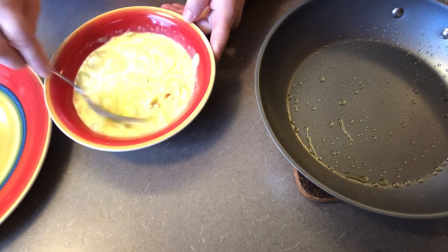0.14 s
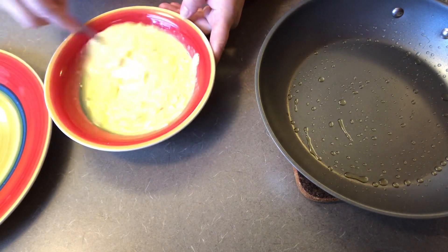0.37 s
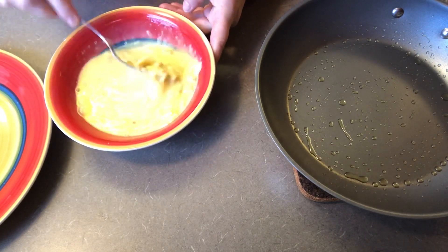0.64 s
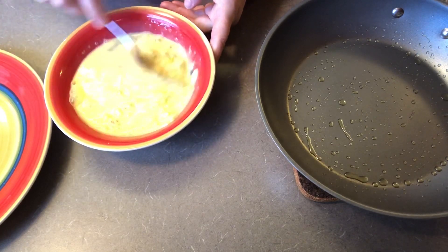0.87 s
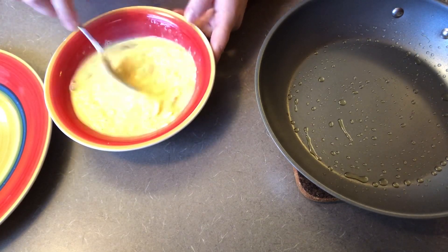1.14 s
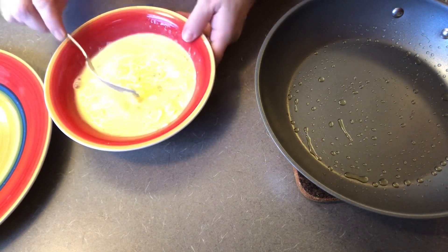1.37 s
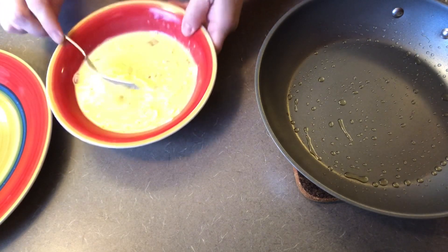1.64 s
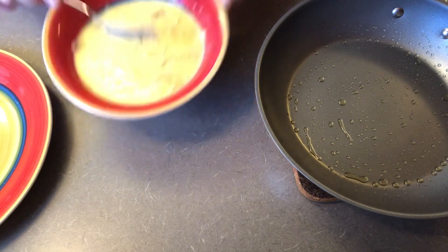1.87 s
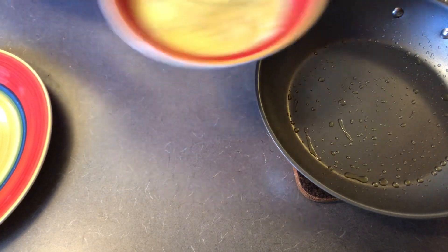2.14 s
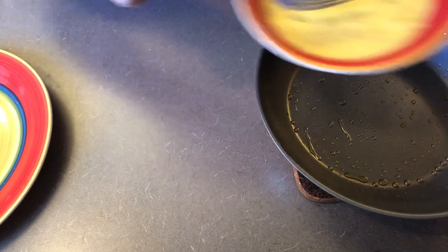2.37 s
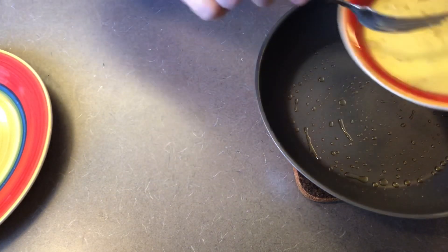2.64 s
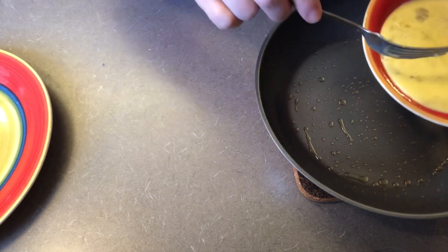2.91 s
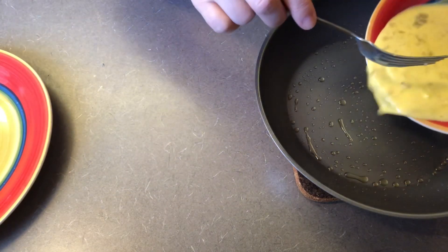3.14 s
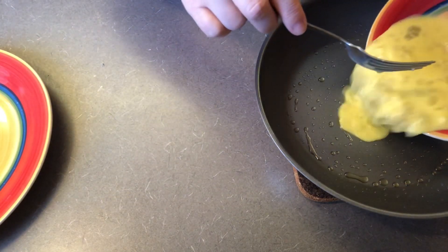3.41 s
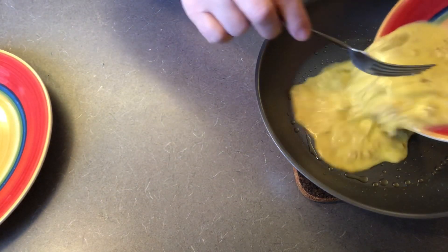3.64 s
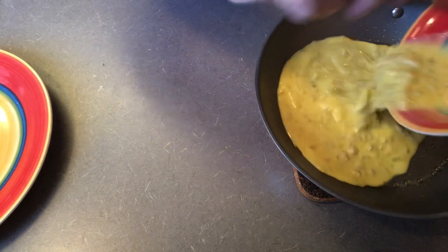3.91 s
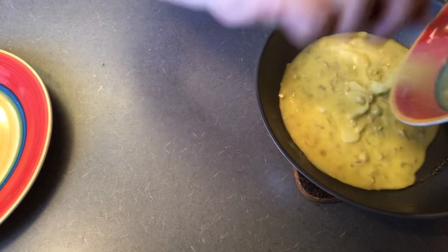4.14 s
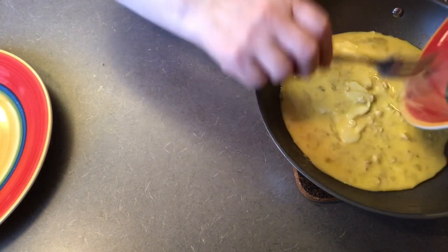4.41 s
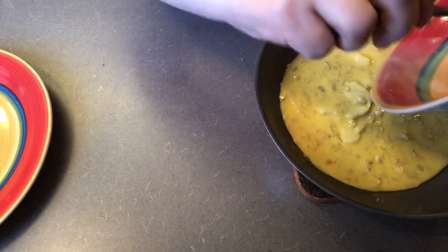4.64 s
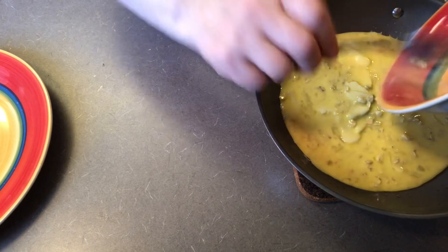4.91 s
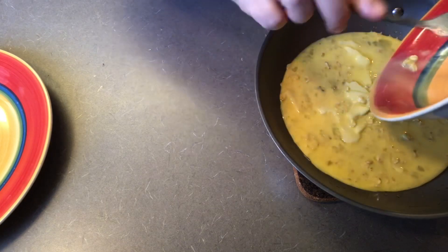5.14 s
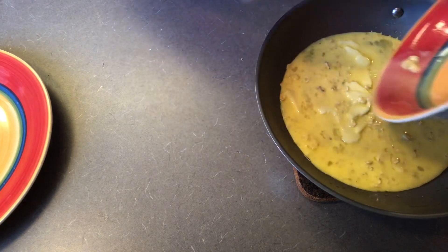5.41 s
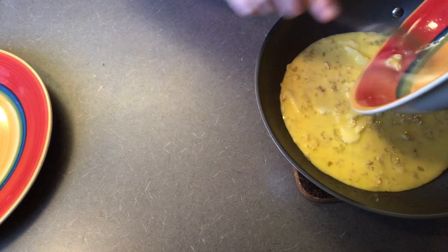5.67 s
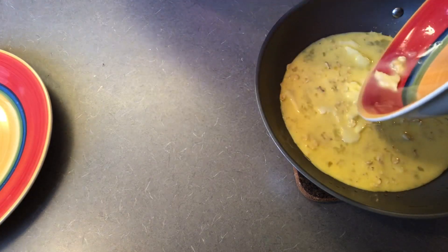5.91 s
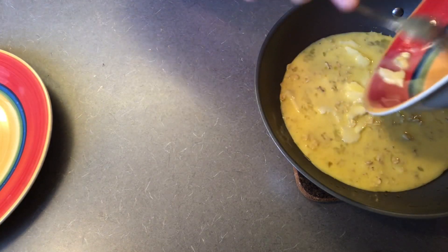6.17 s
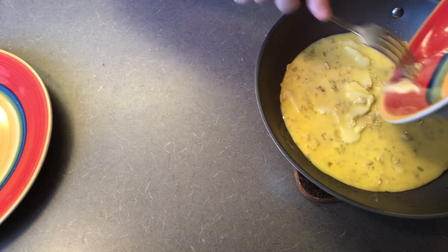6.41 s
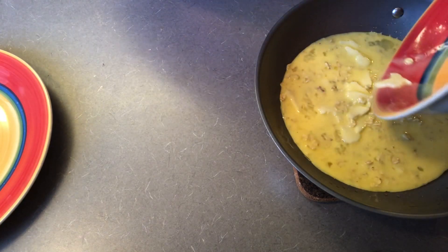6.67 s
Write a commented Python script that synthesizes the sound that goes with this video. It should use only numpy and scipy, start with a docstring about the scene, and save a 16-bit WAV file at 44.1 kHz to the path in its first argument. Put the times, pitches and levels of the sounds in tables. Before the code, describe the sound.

A quiet small kitchen with a steady low hum and slight diffuse echo, heard close. From 0 to 1.3 s a fork stirs thick batter: faint wet crackle, a muted scrape and sharp wet clicks near 0.23 s, then tiny ticks. At 1.4 and 1.58 s the fork clinks firmly on the full ceramic bowl, damped, with a dull worktop bump; lighter clinks follow at 1.9, 2.1 and 2.2 s. Only hum until 3.2 s, when a first drop spits in hot fat. From 3.45 s the pour hisses and gurgles with a few snaps, then gradually weakens. From 4 to 4.8 s, quick rough scrapes with squeaks and clanks; brighter ringing blows and scrapes at 5.1 and 5.4-5.7 s, including a high squeak. A clink at 5.9 s, softer scraping to 6.45 s, and two light taps near 6.7 s over faint frying.

```python
"""A steel fork stirs egg batter in a ceramic bowl with a faint wet crackle, then knocks on the bowl.
A first drop of batter lands in a hot pan, the pour follows, and its sizzle and gurgle fill the scene.
The fork then scrapes the bowl out: slips and blows ring bowl and fork modes, pressed tines squeak.
Throughout, a small kitchen hums as shaped noise and answers with diffuse echoes."""
import sys
import numpy as np
from scipy import signal
from scipy.fft import rfft, irfft, next_fast_len
from scipy.io import wavfile
from scipy.ndimage import uniform_filter1d

SR = 44100
rng = np.random.default_rng(int(sys.argv[2]) if len(sys.argv) > 2 else 0)


def nominal_scale(level):
    """Amplitude ratio for a level in decibels (scalar or array-like)."""
    x = np.asarray(level, float) / 20
    return 10 ** x


def to_wav(s):
    """Save 16-bit WAV."""
    ch = np.atleast_2d(s).T  # columns
    pcm = np.round(np.clip(ch, -1, 1) * 32767)  # PCM
    wavfile.write(sys.argv[1], SR, pcm.astype(np.int16))


N = 299439
TIME = np.arange(N) / SR

# Ringing modes of the ceramic bowl, before damping by batter or touch.
# Each row: frequency in Hz, level in dB, free t60 in seconds.
BOWL_MODES = [(2030, -30, 0.035), (1993, 6.5, 0.096), (2170, -15, 0.14), (2747, -27.5, .03),
              (3149, -8, 0.025), (3362, -4, 0.05), (4920, 2.5, 0.013), (5060, -1.5, 0.11),
              (5350, -5, 0.016), (6290, -13, 0.076), (7000, 0.5, .04), (6710, -3, 0.027),
              (7300, -5.5, 0.084), (8350, -12, 0.029), (9034, -6, 0.12), (10360, 3.5, 0.013),
              (11200, 1, 0.013), (10900, -3.5, .04), (11400, -2.5, .04), (12200, 0.5, 0.079),
              (12960, -1, 0.023), (13400, -20, .04), (13700, -6.5, .03), (14900, -10.5, 0.047)]
# Ringing modes of the steel fork, before damping by grip or touch.
# Each row: frequency in Hz, level in dB, free t60 in seconds.
FORK_MODES = [(3700, -12, 0.18), (4470, 2, 0.16), (4380, 2.5, 0.18), (5470, -23, 0.26), (6596, 4.5, 0.13),
              (7680, -6.5, 0.089), (8480, -10.5, 0.12), (9710, -0.5, 0.049), (9500, -22, 0.21),
              (12230, -20.5, 0.04), (14100, -17.5, 0.033)]
# Dull modes of the bowl wall, before damping by the hand or touch.
# Each row: frequency in Hz, level in dB, free t60 in seconds.
WALL_MODES = [(297, -4, 0.075), (446, 3.5, 0.22), (656, -2.5, 0.097), (920, -2, 0.1), (1070, -0.5, 0.016),
              (1280, -1.5, 0.0033), (1650, -4.5, 0.0088)]
# Where a contact lands decides how hard each region of bowl modes is driven. Region centres in Hz.
REGIONS_HZ = [2000, 3300, 5000, 11000]


def rms_one(x):
    """Scale to rms 1."""
    return x / np.sqrt(np.mean(x ** 2) + 1e-20)


def at_hz(points, hz):
    """Read a (Hz, value) table on a log-frequency axis."""
    table_hz, values = np.array(points)[:, 0], np.array(points)[:, 1]
    return np.interp(np.log(hz), np.log(table_hz), values)


def gain_curve(points):
    """Gain over time from (seconds, dB) points; silent outside them."""
    s, level_db = np.transpose(points)
    return nominal_scale(np.interp(TIME, s, level_db, -200, -200))


def coloured(x, spectrum, peaks=()):
    """Filter x by a spectrum in dB with optional humps of (Hz, width in Hz, dB); rms 1."""
    size = next_fast_len(N)
    hz = np.maximum(np.fft.rfftfreq(size, 1 / SR), 1)
    db = at_hz(spectrum, hz)
    for mid_hz, width_hz, top_db in peaks:
        db = db + top_db * np.exp(-((hz - mid_hz) / width_hz) ** 2)
    return rms_one(irfft(rfft(x, size) * nominal_scale(db), size)[:N])


def band(x, low_hz, high_hz):
    """Band-pass, rms 1."""
    return rms_one(signal.sosfilt(signal.butter(2, [low_hz, high_hz], "band", fs=SR, output="sos"), x))


def grains(per_s, spread_db):
    """Random clicks of uneven size and sign; rms 1."""
    sizes = nominal_scale(spread_db * np.minimum(rng.exponential(1, N), 5)) * rng.choice([-1, 1], N)
    return rms_one(sizes * (rng.random(N) < per_s / SR))


def drift(rate):
    """Slow chance: straight lines between normal knots of spread 1, rate knots per second."""
    knots = rng.standard_normal(int(N / SR * rate) + 2)
    return np.interp(TIME * rate, np.arange(len(knots)), knots)


def ring(force, hz, t60):
    """Resonator: a unit click sets a decaying sine of height 1 ringing."""
    radius, angle = nominal_scale(-60 / (t60 * SR)), 2 * np.pi * hz / SR
    feedback = [1, -2 * radius * np.cos(angle), radius * radius]
    return signal.lfilter([0, np.sin(angle)], feedback, force + 1e-18)


def add(out, s, sound):
    """Mix a short sound in at time s."""
    at = round(s * SR)
    out[at:at + len(sound)] += sound[:N - at]


def blow(modes, colour_db, stretch=0.48, detune=0.0):
    """A loud clang while the contact damps the modes, then a freer ring; stretch scales its length.
    Modes start a little apart as the tines land in turn; grip and contact vary strength and pitch."""
    rise_s, spread_s = 0.00081, 0.004
    clang_db, clang_t60 = 1.0, 0.023
    grip_db, grip_per_s = 2.5, 70   # the shifting grip makes the level of every ring waver
    hz, level_db, t60 = np.transpose(modes)[:, :, None]
    start = spread_s * rng.random(hz.shape) ** 2
    t = np.maximum(np.arange(int(.2 * SR)) / SR - start, 0)
    level = nominal_scale(level_db + colour_db(hz) + 1.5 * rng.standard_normal(hz.shape))
    pitch = hz * (1 + detune + .003 * rng.standard_normal(hz.shape))
    knots = rng.standard_normal((len(hz), int(grip_per_s * t.shape[1] / SR) + 2))
    waver_db = grip_db * np.array([np.interp(row * grip_per_s, np.arange(len(k)), k)
                                   for row, k in zip(t, knots)])
    free_ring = nominal_scale(waver_db - 60 * t / (t60 * stretch))
    clang = nominal_scale(clang_db - 60 * t / clang_t60)
    rise = 1 - np.exp(-t / rise_s)
    return np.sum(level * (free_ring + clang) * np.sin(2 * np.pi * pitch * t) * rise, axis=0)


def tilted_blows(events, modes, pivot_hz):
    """Blows on one body; a harder contact tilts the strengths towards the upper modes."""
    out = np.zeros(N)
    for s, level_db, tilt_db in events:
        add(out, s, blow(modes, lambda hz: level_db + tilt_db * np.log2(hz / pivot_hz)))
    return out


def strikes():
    """Fork on bowl: bowl modes plus a short crack; batter shortens the ring and lowers the pitch a little."""
    # Each row: start in seconds, level in dB, nearness to the rim in dB before the region shares,
    # hardness as extra dB on the top region.
    hits = [(1.3985, -20, 2.5, -14), (1.5816, -19.5, 2, -15.5), (1.9143, -29, 13.5, 1.5),
            (2.0893, -27, 14, -1.5), (2.2301, -31.5, 14, -8.5), (3.9655, -44, 20, 19.5),
            (4.155, -55, 22.5, 13.5), (4.214, -52.5, 22.5, -13), (4.5254, -26, -7, -2.5),
            (4.9611, -29.5, -2.5, 5), (5.0903, -40, -3, 2.5), (5.1534, -63, 16, -2), (5.187, -42.5, 4, -2),
            (5.4309, -33.5, -4, -1), (5.5644, -50, 19.5, 12), (5.6216, -37, 8.5, 6.5),
            (5.8967, -32, -3, -1.5), (6.6535, -33, -6.5, -4.5), (6.7284, -42, 0.5, -1)]
    # Share of the rim gain that each region gets, a factor.
    rim_shares = [0.18, 1.285, 0.86, 0]
    # Ring length factor per region while batter loads the bowl.
    ring_full = [0.13, 0.41, 0.58, .2]
    # Ring length factor per region once the bowl is empty.
    ring_empty = [0.83, 1.4, 0.89, 0.94]
    empty_s = 4.4
    out, t = np.zeros(N), np.arange(int(.06 * SR)) / SR
    crack_hz = np.maximum(np.fft.rfftfreq(len(t), 1 / SR), 1)
    for s, level_db, rim_db, top_db in hits:
        region_db = level_db + rim_db * np.array(rim_shares) + top_db * np.array([0, 0, 0, 1])
        colour = list(zip(REGIONS_HZ, region_db))
        lengths = ring_full if s < empty_s else ring_empty
        stretch = at_hz(list(zip(REGIONS_HZ, lengths)), np.array(BOWL_MODES)[:, :1])
        add(out, s, blow(BOWL_MODES, lambda hz: at_hz(colour, hz), stretch, detune=0.001 * (stretch - 1)))
        slope = [(200, level_db - 45), (1000, level_db - 3.0)]   # a small contact radiates little bass
        noise = rms_one(rng.standard_normal(len(t)))
        crack = irfft(rfft(noise) * nominal_scale(at_hz(slope + colour, crack_hz)), len(t))
        add(out, s, nominal_scale(9.0) * crack * nominal_scale(-60 * t / .025) * (1 - np.exp(-t / 0.00077)))
    return out


def knocks():
    """Dull knocks of the whole bowl ring the low modes of its wall."""
    # Each row: start in seconds, level in dB, tilt in dB per octave.
    hits = [(1.402, -30.5, 7), (1.58, -50.5, 11.5), (1.914, -31.5, 18.5), (2.089, -35, 9), (2.229, -43, 6),
            (5.093, -36, 3), (5.13, -40.5, 0), (5.196, -53, 19.5), (5.559, -46.5, 18), (5.622, -35, 9.5)]
    return tilted_blows(hits, WALL_MODES, 810)


def twangs():
    """Blows that set the fork's tines ringing in their own modes."""
    # Each row: start in seconds, level in dB, treble tilt in dB per octave.
    hits = [(4.156, -54, -1), (4.6543, -50.5, -9), (5.0913, -29, 13), (5.1534, -32.5, -19), (5.623, -22, 6)]
    return tilted_blows(hits, FORK_MODES, 5000)


def contact():
    """Drive of each bowl region and of the fork, from pressure and spot of every stroke."""
    # Strokes of the tines over the glaze, each a list of rows that the contact glides between; the third stroke
    # is faint and ends just before the knock at 1.4 s. Each row: time in seconds, pressure in dB, spot as
    # favoured region (held within 0-3), fork drive over pressure in dB before the loss while sunk.
    strokes = [
        [(0.0, -53, .2, -20), (.052, -52, 1.3, -22), (.096, -66, 1.1, -20), (.128, -54, 1.4, -3),
         (.156, -72, .3, -4), (.2, -50, 1.5, -10), (.232, -33, 1.36, -21), (.284, -62, 0.54, -19),
         (.32, -60, .1, -20), (.37, -67, .1, -24), (.42, -90, .1, -15)],
        [(.55, -74, .1, -8), (.736, -83, .9, -7), (.75, -55.5, 2, -9), (.79, -57, .1, -26),
         (.842, -71, 2.1, -6), (.87, -88, 1.1, -6)],
        [(1.22, -83.5, 1.5, -1), (1.268, -67, 1.5, -14), (1.39, -82.5, .9, -14)],
        [(3.98, -47, 1.2, 17), (4.004, -58, 1.1, -11), (4.038, -41, .1, -16), (4.054, -28.5, 0.082, -31.5),
         (4.078, -35.5, 2.44, -15), (4.104, -22, 1.1, -40), (4.118, -62, 2.4, -9), (4.14, -49, 1.6, -25)],
        [(4.16, -22, 0.96, -22), (4.17, -28, 1.3, -19), (4.18, -23, 1.2, -31), (4.205, -25.5, 1.1, -20.5),
         (4.218, -23.5, 1.7, -13), (4.242, -21.5, 1.05, -22), (4.262, -47, 0.78, -2), (4.315, -44.5, 2.9, -4),
         (4.331, -31, 0.88, -30), (4.351, -55, 0.09, -40.5), (4.4, -62, 4.2, -26)],
        [(4.535, -23.5, 0.4, -14.5), (4.561, -38.5, .9, -14), (4.573, -28.5, 5.9, -31), (4.593, -47.5, 2, -13),
         (4.61, -47, 2.1, -14)],
        [(4.66, -27.5, 2.8, -20), (4.674, -55, 2.1, 2.5), (4.696, -38.5, 3, 10.5), (4.72, -40, 2.7, -35.5),
         (4.733, -35.5, 2.8, -16), (4.771, -49.5, 0.77, -10), (4.785, -41, 0.7, -2), (4.83, -78, 1.2, -1)],
        [(5.1, -29, 1.8, 17), (5.112, -33.5, 1.6, 12), (5.128, -44, 2.3, 15), (5.162, -33, 2.1, 4.5),
         (5.178, -42, 1.3, 9.5), (5.19, -28.5, 0.16, 6.5), (5.202, -24.5, 3.15, 8), (5.238, -45, 0.72, -15),
         (5.26, -37.5, 0.83, -4.5)],
        [(5.44, -39, 4.3, -9), (5.46, -31, 0.14, -9), (5.47, -42, 0.25, -14), (5.5, -52.5, 2.6, -3.5),
         (5.521, -41.5, 0.26, 11), (5.541, -34.5, 0.45, -7), (5.558, -21, 2.03, -24), (5.578, -21, 1.3, 0),
         (5.608, -32.5, 0.81, 1), (5.618, -30, 2.3, -4), (5.65, -24, 2.3, -29.5), (5.67, -48.5, 3, 8),
         (5.72, -40, .2, 1.5)],
        [(5.92, -31, .1, -7), (5.944, -42, 0.6, -15), (5.984, -36.5, .5, -16.5), (6.006, -59, 1.1, -18),
         (6.02, -64, 0.89, -4)],
        [(6.09, -66.5, 0.18, -11), (6.128, -51, 0.8, -7), (6.148, -42.5, 0.11, -33), (6.234, -47.5, 0.55, -2.5),
         (6.266, -55, 1.3, -23), (6.3, -35.5, 0.98, -54), (6.319, -28.5, 0.54, -20), (6.363, -36.5, 1.8, -44),
         (6.385, -18, 0.86, -49), (6.403, -30, 0.86, -20), (6.46, -53, 2, -31)],
    ]
    spot_loss_db = 16   # per region away from the favoured one
    stir_end_s, sunk_db = 1.39, -15   # in strokes begun before this, tines sunk in batter hardly ring
    places = np.arange(len(REGIONS_HZ))[:, None]
    regions, fork = np.zeros((len(REGIONS_HZ), N)), np.zeros(N)
    for rows in strokes:
        s, *columns = np.transpose(rows)
        on = slice(int(s[0] * SR), int(s[-1] * SR))
        press_db, spot, fork_db = (np.interp(TIME[on], s, c) for c in columns)
        regions[:, on] += nominal_scale(press_db - spot_loss_db * np.abs(places - spot.clip(0, 3)))
        fork[on] += nominal_scale(press_db + fork_db + sunk_db * (s[0] < stir_end_s))
    settle = int(0.0021 * SR)   # pressure cannot jump
    return list(uniform_filter1d(regions, settle)), uniform_filter1d(fork, settle)


def rubbed(modes, drives, slips, touch_t60):
    """Slips drive every mode; the touch adds its losses to the mode's own, and as the contact wanders
    over the nodes each mode swells and fades on its own."""
    out = np.zeros(N)
    for (hz, level_db, free_t60), drive in zip(modes, drives):
        t60 = 1 / (1 / free_t60 + 1 / touch_t60)
        wander = np.exp(.29 * drift(30))
        ringing = ring(drive * slips * nominal_scale(level_db) * wander, hz, t60)
        out += ringing / np.sqrt(t60 * SR / np.log(1000) / 4)   # long rings come out no louder
    return out


def scrapes():
    """Dense slips of the tines drive bowl and fork modes and leave a gritty rasp around each region."""
    drum_db = -33.5   # drive of the wall under that of the fork
    regions, fork = contact()
    slips = grains(per_s=2500, spread_db=2.5) * nominal_scale(1.5 * drift(120))
    # each bowl mode shares the drives of its two nearest regions
    numbers = np.arange(len(regions))
    places = np.interp(np.log(np.array(BOWL_MODES)[:, 0]), np.log(REGIONS_HZ), numbers)
    drives = np.maximum(0, 1 - np.abs(places[:, None] - numbers)) @ np.array(regions)
    bowl = rubbed(BOWL_MODES, drives, slips, touch_t60=.09)
    tines = rubbed(FORK_MODES, [fork] * len(FORK_MODES), slips, touch_t60=.09)
    wall = rubbed(WALL_MODES, [nominal_scale(drum_db) * fork] * len(WALL_MODES), slips, touch_t60=.1)
    rasp = np.zeros(N)
    for drive, hz in zip(regions + [fork], list(REGIONS_HZ) + [4500]):
        rasp += drive * band(slips, hz / 1.6, hz * 1.5)
    out = nominal_scale(-12.0) * bowl + nominal_scale(-14.0) * tines + wall + nominal_scale(-31) * rasp
    return signal.sosfilt(signal.butter(3, 250, "high", fs=SR, output="sos"), out)   # too small for bass


def gliding_tones(events, waver, flutter_db):
    """Rough, wavering tones that glide, swell and fade; waver is the pitch spread at -35 dB."""
    edge_db = 10.5   # how far start and end lie under the middle
    waver_per_db = .6   # louder tones are rougher
    out, wobble, flutter = np.zeros(N), drift(500), drift(150)
    for k, (s, length, first_hz, last_hz, peak_db) in enumerate(events):
        part = np.linspace(0, 1, int(length * SR))
        on = slice(k * SR // 5, k * SR // 5 + len(part))   # each tone takes its own stretch of chance
        rough = np.clip(waver * nominal_scale(waver_per_db * (peak_db + 35)), waver / 2, .1)
        hz = (first_hz + (last_hz - first_hz) * part) * (1 + rough * wobble[on])
        level_db = peak_db - edge_db * (2 * part - 1) ** 2 + flutter_db * flutter[on]
        add(out, s, nominal_scale(level_db) * np.sin(2 * np.pi * np.cumsum(hz) / SR))
    return out


def squeaks():
    """A tine pressed on the glaze sings, its pitch gliding as the free length changes."""
    # Each row: start in seconds, length in seconds, first pitch in Hz, last pitch in Hz,
    # mid-tone level in dB before flutter.
    tones = [(3.967, 0.045, 3570, 2820, -32.5), (4.036, 0.062, 6470, 6550, -36),
             (4.021, 0.092, 2160, 2000, -36), (4.055, 0.061, 5300, 4880, -31.5),
             (4.056, 0.023, 2780, 2900, -46), (4.15, 0.026, 2740, 2750, -39.5),
             (4.166, .08, 1750, 1670, -47.5), (4.28, 0.067, 2300, 2260, -50),
             (4.306, 0.047, 3750, 3760, -42.5), (4.72, 0.057, 1976, 2295, -51),
             (5.184, 0.044, 934, 1060, -40.5), (5.554, 0.062, 1650, 850, -38.5),
             (5.545, .08, 4870, 4420, -22.5), (5.55, 0.064, 3650, 3450, -28),
             (6.168, 0.067, 4700, 4520, -58), (6.27, 0.072, 4570, 5400, -63),
             (6.199, 0.11, 2070, 2260, -58.5), (6.216, .07, 8300, 8000, -63),
             (6.235, 0.089, 3560, 3050, -47), (6.3, 0.098, 2990, 2840, -45.5),
             (6.35, 0.056, 6880, 6820, -37)]
    return gliding_tones(tones, waver=.02, flutter_db=4.0)


def stirring():
    """Batter moving round the fork: a faint wet crackle of dense small clicks."""
    # Each row: time in seconds, level in dB before a slow flicker.
    strength = [(0.0, -84), (0.166, -68), (0.336, -68), (0.468, -84), (0.726, -70.5), (1.048, -96.5),
                (1.268, -69.5), (1.39, -70)]
    # Each row: frequency in Hz, relative level in dB per Hz.
    colour = [(880, -27.5), (1500, 4), (1880, 1.5), (3120, -0.5), (4970, -7.5), (8490, -9), (16000, -18)]
    crackle = coloured(grains(per_s=1300, spread_db=3.0), colour)
    return gain_curve(strength) * crackle * nominal_scale(2.0 * drift(23.0))


def sizzle():
    """Frying: a dense hiss of tiny bursts with lone spits on top and larger bubbles gurgling below."""
    # Vigour of the frying, a first drop and then the pour. Each row: time in seconds, hiss level in dB.
    strength = [(3.17, -100), (3.19, -52.5), (3.3, -53.5), (3.43, -57), (3.46, -48.5), (3.54, -50.5),
                (3.66, -49), (3.9, -54.5), (4.4, -59), (4.9, -64), (5.4, -65.5), (5.85, -66.5),
                (6.1, -70.5), (6.55, -70.5), (6.79, -69)]
    # Each row: frequency in Hz, relative level in dB per Hz.
    colour = [(350, -31.5), (600, 4.5), (708, 16.5), (846, 7.5), (1610, -4), (2610, -8.5), (6200, -3),
              (8500, -9.5), (15100, -8), (16000, -20)]
    pour_s, spread_s = 3.5, 0.12   # the pool spreads: larger bubbles join, the finest spray is smothered
    hiss = gain_curve(strength)
    vigour = hiss / hiss.max()
    thin = np.exp(-np.maximum(TIME - pour_s, 0) / spread_s)
    gurgle = nominal_scale(-56 - 9.5 * thin) * vigour ** 0.39
    treble = nominal_scale(-73 + 8 * thin) * vigour ** 0.95
    bursts = []
    for _ in range(3):
        spits = .12 * grains(per_s=150, spread_db=2.0)
        bursts.append(coloured(grains(per_s=12000, spread_db=3.0) + spits, colour))
    bubbles = sum(ring(grains(per_s=120, spread_db=3.0), hz, 10.0 / hz) for hz in np.geomspace(1200, 2800, 8))
    low = band(bursts[0], 900, 2800) + .4 * rms_one(bubbles)
    return gurgle * low + hiss * band(bursts[1], 2200, 9000) + treble * band(bursts[2], 8300, 18000)


def glugs():
    """Air caught under the pour gurgles out, falling in pitch."""
    # Each row: start in seconds, length in seconds, first pitch in Hz, last pitch in Hz,
    # mid-tone level in dB before flutter.
    tones = [(3.46, 0.15, 1920, 1200, -53)]
    return gliding_tones(tones, waver=.2, flutter_db=5.0)


def ticks():
    """Wet clicks and spits of batter and fat: a small bursting bubble, rising in pitch, with a broad snap."""
    # Each row: start in seconds, level in dB, starting pitch in Hz, cycles over which the tone decays
    # (at least 0.5).
    clicks = [(0.062, -46, 3000, 1.1), (0.121, -40, 5060, 1.2), (0.2302, -22, 6360, 1.2),
              (0.2433, -28, 6200, 3.4), (0.314, -44, 2520, 0.76), (0.4344, -62, 5730, 3.7),
              (0.5089, -43, 5060, 4.0), (0.5824, -56.5, 4590, 2.4), (0.7525, -47, 2500, 1),
              (0.777, -52, 3650, 2.9), (0.809, -46, 7200, 2.9), (0.835, -48.5, 4960, 6.3),
              (0.9113, -48.5, 3370, 3.1), (0.999, -51, 3670, 4.4), (1.002, -50.5, 2630, 4.3),
              (1.1414, -54.5, 4160, 3.5), (1.26, -49.5, 3470, 4.8), (3.191, -29, 12800, 3.1),
              (3.209, -37, 6150, 1.6), (3.266, -35, 7300, 8.9), (3.3553, -30.5, 7590, 3.3),
              (3.621, -26.5, 5270, 1.7), (3.7858, -41.5, 6610, 5.2)]
    out, t = np.zeros(N), np.arange(int(.02 * SR)) / SR
    for s, peak_db, hz, cycles in clicks:
        fade = np.exp(-t * hz / max(cycles, .5))
        tone = np.sin(2 * np.pi * hz * t * (1 + 6.8 * t))
        snap = 0.14 * np.diff(rng.standard_normal(len(t) + 1)) * np.exp(-t / 0.00022)
        add(out, s, nominal_scale(peak_db) * (fade * tone + snap))
    return out


def bumps():
    """The bowl's foot bumps the worktop, whose modes ring; it is stiff and gives no deep bass."""
    # Each row: start in seconds, level in dB, tilt in dB per octave.
    hits = [(.79, -51, -3.5), (1.402, -29, -1.5), (1.418, -40, -1), (1.47, -52.5, -4.5), (1.52, -46, -2.5),
            (1.585, -51, 4)]
    # Modes of the worktop under the bowl, before the blow shortens them.
    # Each row: frequency in Hz, level in dB, free t60 in seconds.
    worktop = [(119, -4.5, 0.06), (155, -2, 0.13), (248.3, 4, 0.092), (334, -3, 0.36), (420, -2, 0.26),
               (470, -1, 0.14), (756, -4, 0.18), (1070, -13, .05)]
    thuds = tilted_blows(hits, worktop, 170.0)
    return signal.sosfilt(signal.butter(3, 70, "high", fs=SR, output="sos"), thuds)


def kitchen(x):
    """Diffuse echoes: overlapping bands of noise, each dying at its own rate, after a short gap."""
    # Each row: frequency in Hz, t60 in seconds.
    decay = [(100, 0.7), (500, 0.88), (2000, 0.091), (5000, 0.56), (10000, 0.04), (16000, 0.19)]
    t, tail = np.arange(int(.7 * SR)) / SR, 0
    for low_hz in 60 * 2. ** np.arange(8):
        sos = signal.butter(2, [low_hz, 2.66 * low_hz], "band", fs=SR, output="sos")
        noise = signal.sosfilt(sos, rng.standard_normal(len(t)))
        tail = tail + noise * nominal_scale(-60 * t / at_hz(decay, 1.91 * low_hz))
    tail *= np.clip((t - .003) / 0.0038, 0, 1)
    return nominal_scale(-14) * signal.fftconvolve(x, tail / np.sqrt(np.sum(tail ** 2)))[:N]


def kitchen_hum():
    """Steady kitchen background: shaped noise with narrow humps, its level drifting slightly."""
    # Each row: frequency in Hz, relative level in dB per Hz.
    colour = [(15, -61), (25, -32.5), (66, -6), (124, -6.5), (232, 1), (349, -7.5), (483, -12.5),
              (617, -16), (706, -18.5), (927, -20), (1250, -20.5), (3060, -33.5), (5880, -33), (15200, -48),
              (16500, -62)]
    # Humps on that spectrum. Each row: centre in Hz, width in Hz, height in dB.
    humps = [(85, 24, 4.5), (242, 38, -1), (483.2, 35, 10), (784, 150, 10)]
    return nominal_scale(-56) * coloured(rng.standard_normal(N), colour, humps) * nominal_scale(.5 * drift(6.1))


def scene():
    """Everything near the microphone, its echoes and the background."""
    hits = strikes() + twangs() + knocks() + bumps()
    rubs = scrapes() + squeaks()
    wet = stirring() + sizzle() + glugs() + ticks()
    near = hits + rubs + wet
    return (near + kitchen(near) + kitchen_hum())[None]


def low_pass(x):
    """Removes everything above the highest recorded frequency."""
    return signal.sosfilt(signal.butter(12, 17090, fs=SR, output="sos"), x)


def record(dry):
    """A small microphone that loses the deepest bass and the top."""
    no_bass = signal.sosfilt(signal.butter(2, 40, "high", fs=SR, output="sos"), dry)
    mix = signal.sosfilt(signal.cheby2(8, 50, 17200, fs=SR, output="sos"), no_bass)
    return low_pass(mix)


dry = scene()
out = record(dry)
to_wav(out)
```